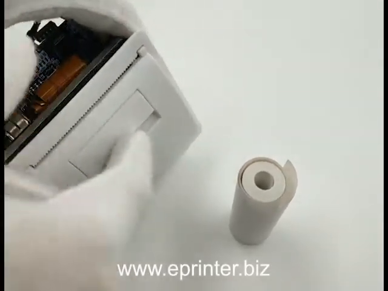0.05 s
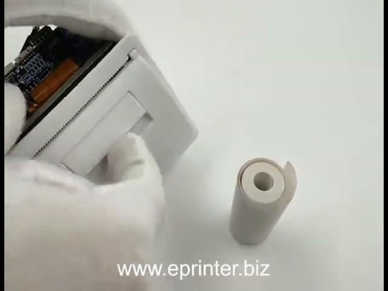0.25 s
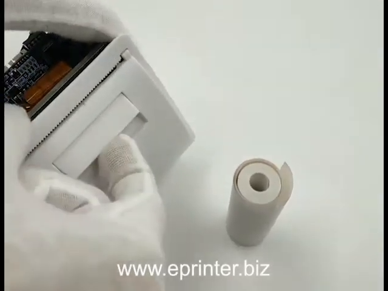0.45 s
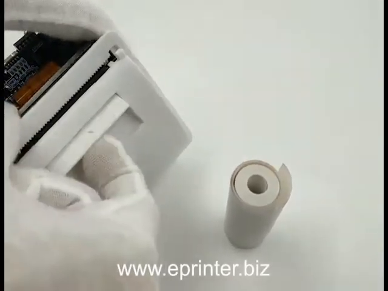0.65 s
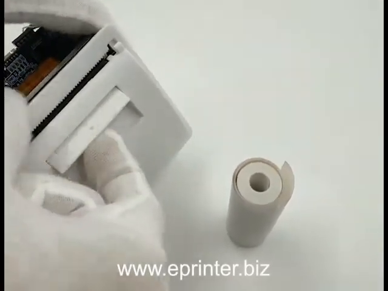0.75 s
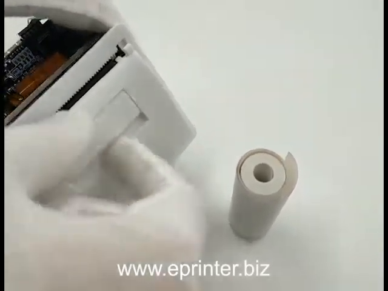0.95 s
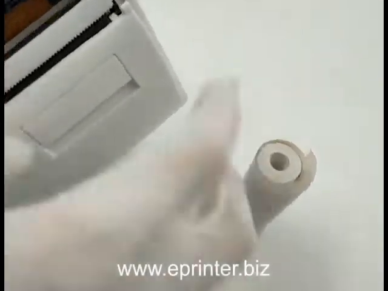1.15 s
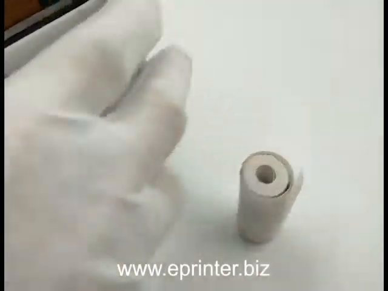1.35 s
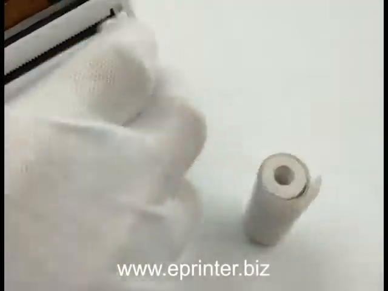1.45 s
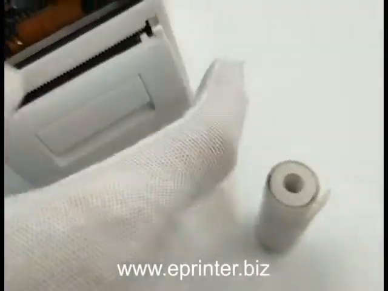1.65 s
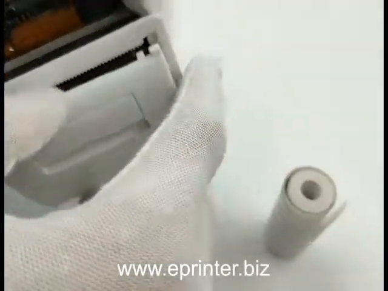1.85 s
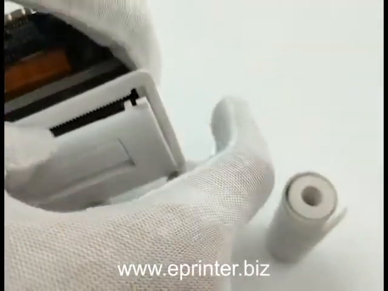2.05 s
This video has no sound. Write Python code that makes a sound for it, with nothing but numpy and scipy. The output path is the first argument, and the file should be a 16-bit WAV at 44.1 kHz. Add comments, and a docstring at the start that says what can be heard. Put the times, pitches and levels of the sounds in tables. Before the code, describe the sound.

A plastic latch on a small printer ticks quickly, then snaps sharply at about 0.3 seconds, the loudest sound, leaving a faint spring ring and table thud. The cover pops open at 0.7 seconds. Gloves brush the casing softly, with faint clicks until 1.4 seconds. Light plastic knocks come around 1.8 to 2 seconds, then a tiny fingertip squeak. Everything is close, in a quiet room.

```python
"""Opening a small printer's cover

Gloved hands work the plastic cover of a printer on a table, close by in a quiet room. The latch lever
ticks under strain and snaps free, jolting the table and leaving its spring ringing. The cover pops open,
gloves brush the casing, and the shell knocks and squeaks under a fingertip as it is turned."""
import sys
import numpy as np
from scipy import signal
from scipy.fft import rfft, irfft
from scipy.io import wavfile
from scipy.ndimage import uniform_filter1d

SR = 44100
rng = np.random.default_rng(int(sys.argv[2]) if len(sys.argv) > 2 else 0)


def generate_wav(signal):
    """Clip the signal to [-1, 1] and save it as 16-bit WAV at the path in sys.argv[1]."""
    frames = np.transpose(np.atleast_2d(signal))
    scaled = np.clip(frames, -1, 1) * 32767
    pcm = np.round(scaled).astype(np.int16)
    wavfile.write(sys.argv[1], SR, pcm)


N = 92610
T = np.arange(N) / SR
HZ = np.maximum(np.fft.rfftfreq(N, 1 / SR), 1)
RELEASE_S = 0.341


def undb(db):
    """Decibels to gain."""
    return 10 ** (np.asarray(db) / 20)


def unit_rms(x):
    """Scale to rms 1."""
    return x / np.sqrt(np.mean(x ** 2))


def decay(t60_s):
    """Exponential fall, 60 dB in t60_s."""
    return np.exp(-np.log(1000) * T / t60_s)


def delay(x, start_s):
    """Move a sound to its start time."""
    return np.concatenate([np.zeros(int(start_s * SR)), x])[:N]


def tilt_gain(hz, db_per_oct):
    """Spectral tilt about 3 kHz, flat below 500 Hz."""
    return undb(db_per_oct * np.log2(np.maximum(hz, 500) / 3000))


def noise(spectrum, db_per_oct=0, grain=1):
    """White noise times grain, shaped to a spectrum and tilt, at rms 1."""
    hz, db = np.array(spectrum).T
    gain = undb(np.interp(np.log(HZ), np.log(hz), db)) * tilt_gain(HZ, db_per_oct)
    return unit_rms(irfft(rfft(grain * rng.standard_normal(N)) * gain, N))


def ring(modes, db_per_oct=0, t60_scale=1, scatter_db=1.16):
    """Damped sines; each contact excites them a little differently."""
    out = np.zeros(N)
    for hz, db, t60_s in modes:
        gain = undb(db + scatter_db * rng.standard_normal()) * tilt_gain(hz, db_per_oct)
        out += gain * decay(t60_s * t60_scale) * np.sin(2 * np.pi * (hz * T + rng.random()))
    return out


def strike(hits, modes, spectrum, modes_db, dense_db, dense_t60_s, crack_db, crack_t60_s, highpass_hz):
    """Contacts crack, then ring a part's main modes and dense small ones; small parts radiate no bass."""
    out = np.zeros(N)
    attack = 1 - decay(0.001)
    for start_s, db, db_per_oct, t60_scale in hits:
        envelope = undb(crack_db) * decay(crack_t60_s) + undb(dense_db) * decay(dense_t60_s * t60_scale)
        burst = noise(spectrum, db_per_oct) * envelope
        tones = undb(modes_db) * ring(modes, db_per_oct / 2, t60_scale)
        out += undb(db) * delay((burst + tones) * attack, start_s)
    return signal.sosfilt(signal.butter(4, highpass_hz, "high", fs=SR, output="sos"), out)


# Each row: frequency in Hz, relative level in dB.
AIR_SPECTRUM = [(20, -1), (28, 0.5), (38, -4.5), (52, -9.5), (78, -16), (120, -12), (200, -16.5),
                (320, -17), (450, -26), (1000, -25), (1600, -32.5), (5000, -40), (9000, -40),
                (10500, -49.5), (13000, -46.5), (15800, -41)]

def air():
    """Low room rumble and faint, even hiss."""
    return undb(-49) * noise(AIR_SPECTRUM)


def room(x):
    """The walls add a faint, short tail."""
    reflections = irfft(rfft(rng.standard_normal(N)) * tilt_gain(HZ, db_per_oct=-3), N)
    tail = delay(reflections * decay(t60_s=0.42), start_s=0.012)
    return x + undb(-23.5) * signal.fftconvolve(x, tail / np.linalg.norm(tail))[:N]


# Each row: frequency in Hz, relative level in dB.
BOOM_SPECTRUM = [(25, 3.5), (55, 15), (85, 4), (150, -9.5), (230, 5.5), (400, -17.5), (1000, -46),
                 (16000, -79.5)]

def table_boom():
    """The snap jolts printer and table into a faint boom."""
    return delay(undb(-41) * noise(BOOM_SPECTRUM) * decay(t60_s=0.54), RELEASE_S)


# Each row: start in seconds, level in dB, tilt in dB/octave, T60 factor.
HAND_BUMPS = [(.122, -45.5, 4, 1.3), (.418, -45.5, 1, 1.4), (2.028, -44, 6, 1.2)]
# Each row: frequency in Hz, relative level in dB, base T60 in seconds.
BODY_MODES = [(320, 11.5, 0.043), (450, -9, 0.027)]
# Each row: frequency in Hz, relative level in dB.
BODY_SPECTRUM = [(60, -25), (200, -2), (420, 19), (800, -7), (1500, -29), (16000, -41)]

def hand_bumps():
    """Fingers and hand thud softly on the printer's body."""
    return strike(HAND_BUMPS, BODY_MODES, BODY_SPECTRUM, modes_db=-9, dense_db=0.5, dense_t60_s=0.047,
                  crack_db=-6, crack_t60_s=0.0073, highpass_hz=100)


# Each row: centre in seconds, half length in seconds, relative level in dB, tilt in dB/octave.
GLOVE_STROKES = [(0.057, 0.058, -59, -1.5), (0.487, 0.012, -63, -18), (.532, 0.025, -47, -1.5),
                 (0.671, 0.039, -54.5, -3), (0.74, 0.029, -47.5, -0.5), (0.874, 0.052, -58.5, -0.5),
                 (0.982, 0.037, -51, -5), (1.17, 0.045, -52.5, -0.5), (1.237, 0.02, -44.5, 1.5),
                 (1.302, 0.034, -52, 0), (1.592, 0.058, -55.5, 0), (1.71, 0.048, -51.5, 2),
                 (1.803, 0.021, -50.5, -2), (1.9, 0.049, -51, -4), (1.956, 0.019, -40, 11.5),
                 (2.03, 0.029, -46.5, -3), (2.09, .02, -51.5, -3.5)]
# Each row: frequency in Hz, relative level in dB.
GLOVE_SPECTRUM = [(300, -8), (1100, -0.5), (2700, -3.5), (3600, -1.5), (4700, -3), (7200, 1), (9200, 4.5),
                  (10500, -8), (12500, -5), (16000, -12.5)]
# Each row: frequency in Hz, bandwidth in Hz, gain in dB.
CASING_RESONANCES = [(970, 130, -3), (2090, 130, 3.5), (3265, 63, 10), (3750, 110, 4), (7860, 340, -15.5),
                     (8800, 500, -10)]

def glove_rubs(catch_hz=490, catch_depth=0.27):
    """Threads catch and slip in strokes that swell and fade; the casing resonates under them."""
    friction = np.zeros(N)
    for centre_s, half_s, db, db_per_oct in GLOVE_STROKES:
        weave = np.interp(T * catch_hz, np.arange(N), rng.standard_normal(N))
        swell = np.exp(-((T - centre_s) / half_s) ** 2)
        friction += undb(db) * swell * noise(GLOVE_SPECTRUM, db_per_oct, np.exp(catch_depth * weave))
    casing = sum(undb(db) * signal.lfilter(*signal.iirpeak(hz, hz / width_hz, fs=SR), friction)
                 for hz, width_hz, db in CASING_RESONANCES)
    return undb(-2) * (friction + casing)


# Each row: start in seconds, length in seconds, level in dB.
FINGER_SQUEAKS = [(2.061, 0.0092, -38.5), (2.07, 0.016, -41.5)]

def finger_squeaks(pitch_hz=1443, jitter=0.0214):
    """A fingertip sticks and slips on the plastic: brief tones of unsteady pitch."""
    waver = unit_rms(uniform_filter1d(rng.standard_normal(N), size=80))
    phase = 2 * np.pi * np.cumsum(pitch_hz * (1 + jitter * waver)) / SR
    envelope = np.zeros(N)
    for start_s, length_s, db in FINGER_SQUEAKS:
        progress = np.clip((T - start_s) / length_s, 0, 1)
        envelope += undb(db) * np.sqrt(np.abs(np.sin(np.pi * progress)))
    return envelope * (np.sin(phase) + undb(-32) * np.sin(2 * phase))


# Each row: start in seconds, level in dB, tilt in dB/octave, T60 factor.
SHELL_KNOCKS = [(1.792, -44.5, -9.5, 0.81), (1.817, -71, 3, 0.64), (1.8598, -55, -13, 1.1),
                (1.8945, -44.5, -0.5, 2), (1.9423, -42.5, 6, 0.76), (1.951, -43.5, 4, 3.9),
                (1.9698, -31, -0.5, 1.08), (1.977, -30, 7.5, 0.97), (2.073, -41.5, 6.5, 0.84)]
# Each row: frequency in Hz, relative level in dB, base T60 in seconds.
SHELL_MODES = [(690, -6, .04), (922, -2, .05), (1220, -7, .05), (1400, -8, .04), (1866, -2, .05),
               (2410, 0, .085), (3295, -3, .07), (4555, -1, .06), (6980, -13, .06), (7915, -8, .06),
               (9450, -13, .06)]
# Each row: frequency in Hz, relative level in dB.
SHELL_SPECTRUM = [(100, -7), (480, -25), (700, 6), (1800, 9), (3000, -3.5), (5500, -6.5), (8500, -7),
                  (10500, -22.5), (16000, -16.5)]

def shell_knocks():
    """The plastic shell knocks as it is turned."""
    return strike(SHELL_KNOCKS, SHELL_MODES, SHELL_SPECTRUM, modes_db=-6.5, dense_db=2,
                  dense_t60_s=0.061, crack_db=-5, crack_t60_s=0.0044, highpass_hz=540)


# Each row: start in seconds, level in dB, tilt in dB/octave, T60 factor.
COVER_POPS = [(.7333, -22, 4, 1.03), (.945, -52.5, 2, 0.67), (.965, -44, 5, 0.6), (.998, -58, -1, 1.1),
              (1.056, -50.5, -2, 1.6), (1.161, -46.5, -5, 0.54), (1.224, -51, -8, 1.4),
              (1.363, -46, -1, 0.93)]
# Each row: frequency in Hz, relative level in dB, base T60 in seconds.
COVER_MODES = [(877, 4, .075), (945, -4, .05), (1141, -9, .07), (1362, 5, .052), (1520, -6, .05),
               (2055, -7, .05), (2485, -7, .065), (2622, -7, .06), (2960, -6, .055), (3556, -10, .07),
               (3795, -9, .075), (4770, -11, .06), (5150, -12, .055), (6168, -10, .06), (8198, -11, .06)]
# Each row: frequency in Hz, relative level in dB.
COVER_SPECTRUM = [(100, -15.5), (620, -35), (850, -4), (1900, -1), (3300, 5.5), (4400, -3.5), (5200, 0.5),
                  (8700, -4.5), (11000, -19), (16000, -19)]

def cover_pops():
    """The cover pops open, then clicks faintly as it is nudged."""
    return strike(COVER_POPS, COVER_MODES, COVER_SPECTRUM, modes_db=-6, dense_db=-4.5,
                  dense_t60_s=0.069, crack_db=-13, crack_t60_s=0.0045, highpass_hz=670)


# Each row: start in seconds, level in dB, tilt in dB/octave, T60 factor.
LEVER_TICKS = [(.072, -42.5, 6, 0.92), (.0755, -35, -5.5, 0.53), (.090, -40, -6, 0.88),
               (.1202, -44, -5.5, 0.83), (.1643, -40, -9, 0.48), (.1922, -40.5, -6.5, 0.9),
               (.2252, -23.5, .5, 0.66), (.2595, -29, 0.5, 0.76), (.279, -39.5, 0.5, 0.48),
               (.2885, -30.5, -1, 0.9), (.301, -32.5, -0.5, 0.71), (.308, -31.5, -1, 0.44),
               (.3235, -29.5, -1, 0.37), (.3295, -29, -3, 1.3)]
# Each row: frequency in Hz, relative level in dB, base T60 in seconds.
LEVER_MODES = [(800, -7, .03), (935, -4, .06), (1095, -4, .07), (1620, -9, .07), (3170, -7, .1),
               (4510, -14, .07), (5880, -14, .07), (6720, -10, .08), (7900, -6, .08), (8090, -7, .07),
               (8700, -12, .07)]
# Each row: frequency in Hz, relative level in dB.
LEVER_SPECTRUM = [(100, -15), (480, -21.5), (800, -3), (1500, 0.5), (2500, -3.5), (5500, -1.5), (8500, 3.5),
                  (10500, -5), (16000, -14)]

def lever_ticks():
    """The latch lever ticks under strain."""
    return strike(LEVER_TICKS, LEVER_MODES, LEVER_SPECTRUM, modes_db=-3, dense_db=-1.5,
                  dense_t60_s=0.11, crack_db=-1, crack_t60_s=0.0032, highpass_hz=497)


# Each row: frequency in Hz, relative level in dB, T60 in seconds.
SPRING_MODES = [(964, -40, .5), (1048, -46, .75), (1085, -46, .5), (1145, -48, .6), (1298, -38, .3),
                (1362, -51, .45)]
# Each row: frequency in Hz, relative level in dB.
COIL_SPECTRUM = [(600, -46), (850, -19), (980, 0), (1090, 1), (1220, -7), (1340, -4.5), (1700, -16.5),
                 (3500, -22.5), (8000, -26), (16000, -45.5)]

def spring_ring():
    """The latch spring rings on after the snap, its close coil modes beating."""
    coils = undb(-39.5) * noise(COIL_SPECTRUM) * decay(t60_s=0.79)
    return delay(undb(0.5) * ring(SPRING_MODES) + coils, RELEASE_S)


# Each row: start in seconds, level in dB, tilt in dB/octave, T60 factor.
LATCH_SNAPS = [(.3379, -15, -0.5, 0.34), (.3400, -19.5, -1, 0.99), (.3428, -14.5, -3, 0.91),
               (.3485, -16.5, 7, 0.33)]
# Each row: frequency in Hz, relative level in dB, base T60 in seconds.
LATCH_MODES = [(490, -16, .04), (962, -1, .06), (1085, 0, .055), (1360, -4, .07), (2680, -10, .075),
               (2780, -10, .07), (2970, -7, .075), (3130, -8, .07), (3380, -6, .075), (3960, -11, .08),
               (4855, -11, .08), (5960, -12, .07), (6757, -8, .085), (7140, -10, .075), (7745, -9, .075),
               (8764, -11, .075), (9120, -12, .065)]
# Each row: frequency in Hz, relative level in dB.
LATCH_SPECTRUM = [(60, -3), (200, -12), (380, -21), (760, -19), (1080, 1.5), (2100, -6), (3200, 0.5),
                  (5500, -1), (9000, 3), (10800, -7), (13000, -1), (16000, -13)]

def latch_snap():
    """The latch snaps free and rebounds."""
    return strike(LATCH_SNAPS, LATCH_MODES, LATCH_SPECTRUM, modes_db=-1.5, dense_db=-1,
                  dense_t60_s=0.1, crack_db=-7.5, crack_t60_s=0.0074, highpass_hz=70)


def scene():
    """Printer and hands in the room, mono."""
    printer = lever_ticks() + latch_snap() + cover_pops() + shell_knocks() + spring_ring() + table_boom()
    hands = hand_bumps() + glove_rubs() + finger_squeaks()
    return (room(printer + hands) + air())[None]


def record(dry, lowpass_hz=15850):
    """A steep low-pass cuts the highest treble."""
    return signal.sosfilt(signal.ellip(10, 0.2, 75, lowpass_hz, fs=SR, output="sos"), dry)


dry = scene()
out = record(dry)
generate_wav(out)
```